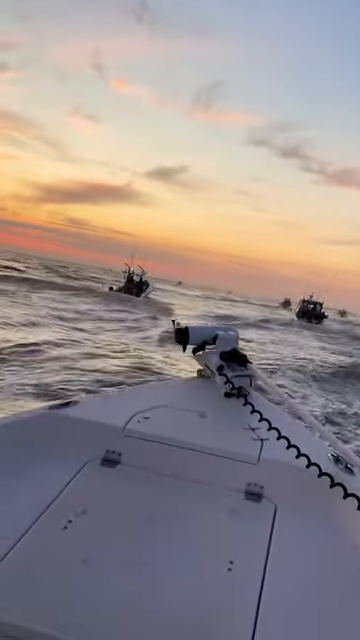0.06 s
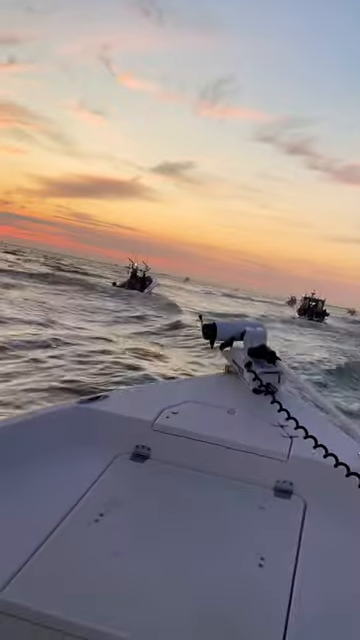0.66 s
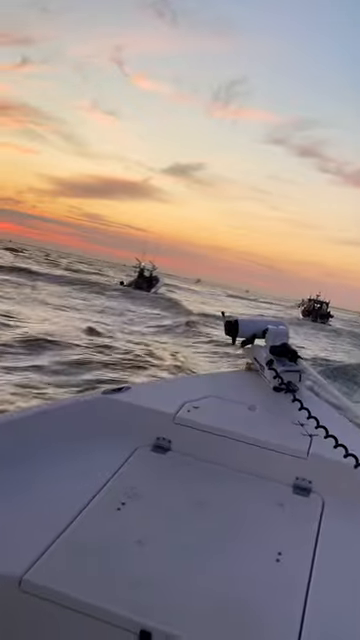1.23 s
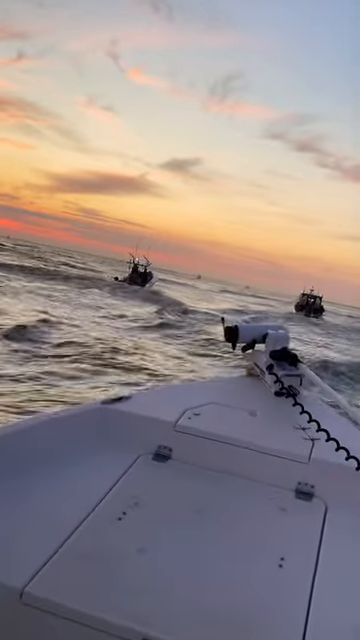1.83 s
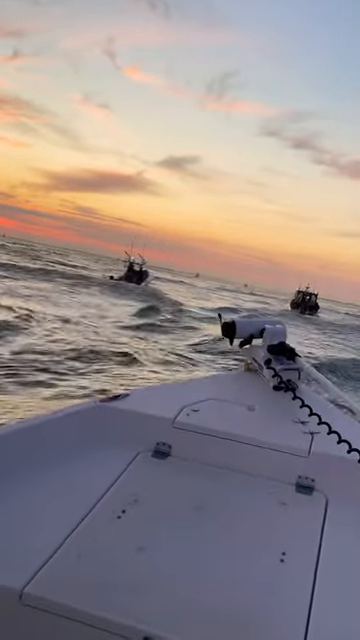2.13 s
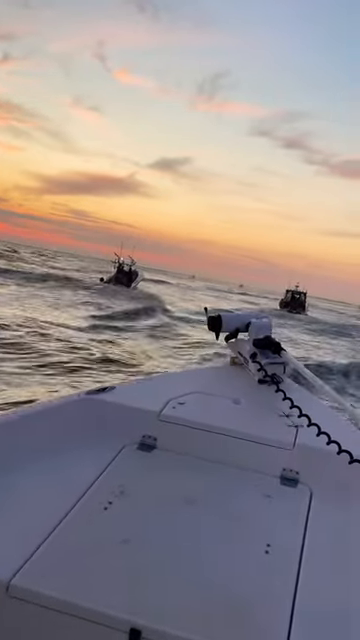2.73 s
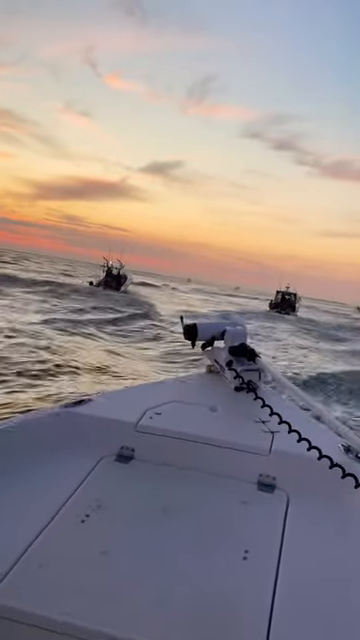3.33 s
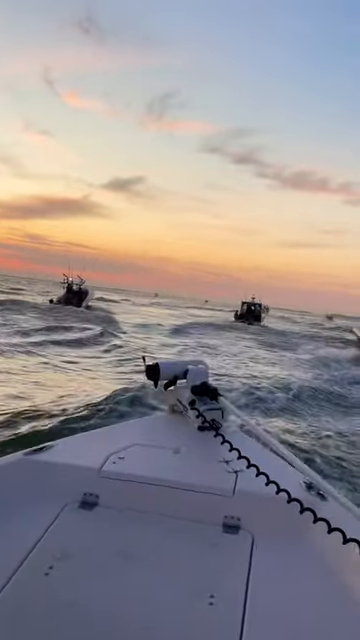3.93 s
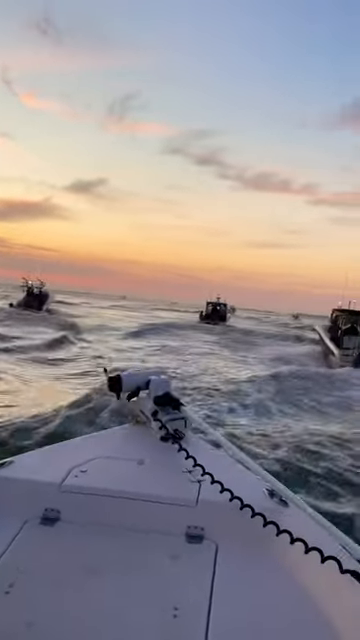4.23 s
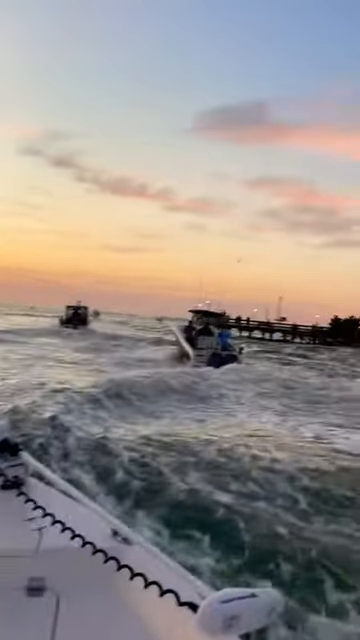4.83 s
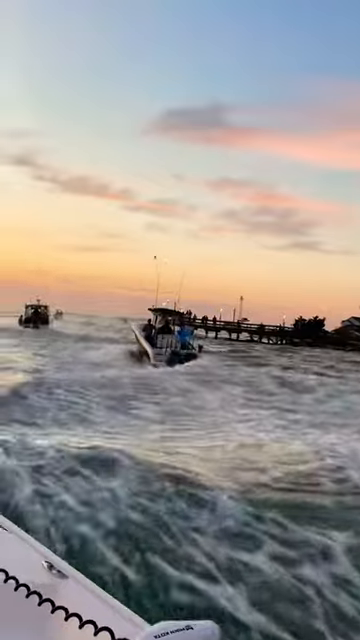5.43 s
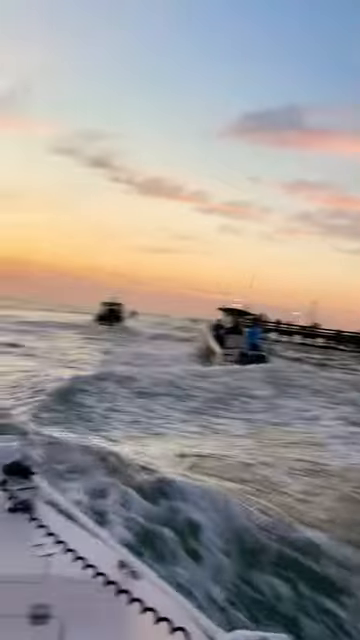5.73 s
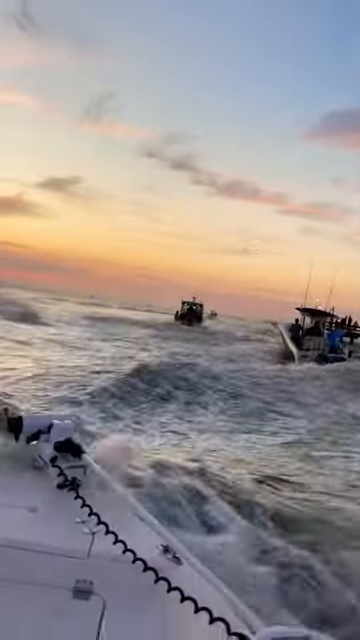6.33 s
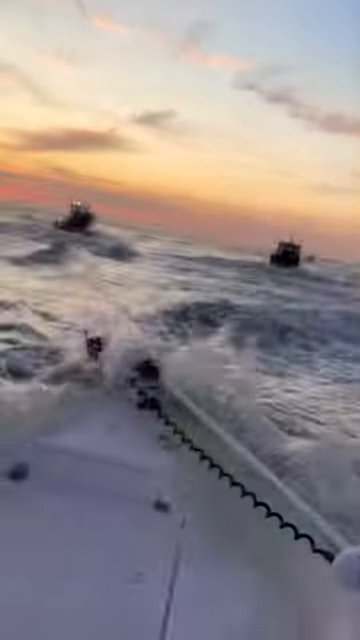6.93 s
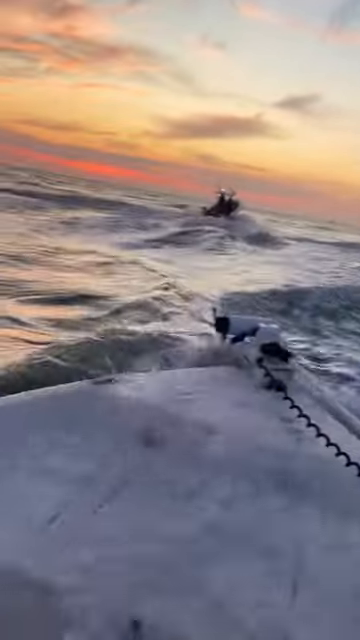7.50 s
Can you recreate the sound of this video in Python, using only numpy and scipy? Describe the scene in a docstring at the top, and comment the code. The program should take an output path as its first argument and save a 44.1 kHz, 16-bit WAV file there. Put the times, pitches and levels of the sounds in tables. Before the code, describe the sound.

An outboard motor hums through choppy water and slows, before waves slap the hull with deep thuds and hissing spray.

```python
"""A six-cylinder outboard drones over rushing water, heard from a speedboat's deck: it sags, speeds up,
holds, then is throttled back. Its exhaust booms at the firing rate and its propeller throbs.
Chop rumbles under the hull, the bow wave rushes and bubbles, and spray hisses along the side.
Then the bow drops into a wake: slaps, deep thuds from the ringing hull and a shower over the deck."""
import sys
import numpy as np
from scipy import signal
from scipy.fft import rfft, irfft, next_fast_len
from scipy.io import wavfile
from scipy.ndimage import uniform_filter1d, map_coordinates

SR = 44100
rng = np.random.default_rng(int(sys.argv[2]) if len(sys.argv) > 2 else 0)


def master_out(mix):
    """Clip the mix to full scale and print it as 16-bit PCM to the path in sys.argv[1]."""
    frames = np.transpose(np.atleast_2d(mix))
    ceiling = np.clip(frames, -1, 1)
    pcm = np.round(ceiling * 32767).astype(np.int16)
    wavfile.write(sys.argv[1], SR, pcm)


N = 337795


def amp(db):
    return 10 ** (np.asarray(db) / 20)


def unit_rms(x):
    return x / np.sqrt(np.mean(x ** 2) + 1e-20)


def along(points, hz):
    """Read (frequency, value) points at hz, on a log axis."""
    freqs, values = np.transpose(points)
    return np.interp(np.log(hz + 1), np.log(freqs + 1), values)


def curves(rows):
    """One value per sample for each column after the time."""
    times, *columns = np.transpose(rows)
    return [np.interp(np.arange(N) / SR, times, column) for column in columns]


def since(start_s):
    """Seconds since start_s, zero before it."""
    return np.maximum(np.arange(N) / SR - start_s, 0)


def held(start_s, length_s, edge_s):
    """A soft gate: fade in, hold, fade out."""
    t = np.arange(N) / SR - start_s
    return (np.tanh(t / edge_s) - np.tanh((t - length_s) / edge_s)) / 2


def swells(rows, edge_s):
    """A level ride in dB from rows of (time, length, gain)."""
    return sum(db * held(s, length, edge_s) for s, length, db in rows)


def wobble(rate):
    """A smooth random curve, rate knots a second."""
    return map_coordinates(rng.standard_normal(int(N * rate / SR) + 4), [np.arange(N) * rate / SR])


def filtered(x, response):
    """Filter x by a complex response of frequency."""
    size = next_fast_len(N + SR // 2)
    return irfft(rfft(x, size) * response(np.fft.rfftfreq(size, 1 / SR)), size)[..., :N]


def band(hz, skirt_db):
    """A spectrum peaking at hz, skirt_db lower an octave to either side."""
    return [(hz / 4, 3 * skirt_db), (hz / 2, skirt_db), (hz, 0),
            (hz * 2, skirt_db), (hz * 4, 3 * skirt_db)]


# stereo image by frequency, with two treble bands in opposite phase:
# (frequency [Hz], left phase lead [rad], likeness [0-1], left minus right [dB])
STEREO_IMAGE = [(30, 0, .7, 2.5), (70, -.03, .95, 2.3), (130, -.05, .995, 2.1), (260, -.1, .95, 2.1),
                (420, -.3, .85, 5.7), (620, -1.4, .8, 1.8), (800, -.9, .65, -1), (1250, -.05, .6, 0),
                (1800, .3, .6, 0), (2450, 2.3, .5, -1.3), (3200, 3.05, .58, -.7), (4100, 2.4, .5, -.7),
                (4700, 2.9, .7, 0), (5150, 3.12, .98, 0), (6050, 3.16, .98, 0), (6500, 3.7, .7, 0),
                (7100, 4.7, .6, 0), (7700, 6.25, .98, 0), (9500, 6.3, .98, 0), (10200, 7.9, .55, 0),
                (11000, 9.4, .995, 0), (12900, 9.44, .995, 0), (13400, 11.6, .4, 0), (13900, 12.55, .98, 0)]
def stereo(direct, diffuse=None):
    """Spread a sound between left and right; its diffuse part differs between the sides."""
    freqs, phase, likeness, lean_db = np.transpose(STEREO_IMAGE)
    side = np.array([[1], [-1]])
    lean = lambda hz: amp(side * np.interp(hz, freqs, lean_db) / 2)
    path = lambda hz: lean(hz) * np.exp(.5j * side * np.interp(hz, freqs, phase))
    if diffuse is None:
        return filtered(direct, path)
    width = lambda hz: np.arccos(np.clip(np.interp(hz, freqs, likeness), 0, 1)) / 2
    shared = filtered(direct, lambda hz: path(hz) * np.cos(width(hz)))
    return shared + side * filtered(diffuse, lambda hz: path(hz) * np.sin(width(hz)))


def rush(spectrum, patchy_db, grain_db, patch_size=10):
    """Stereo water noise, rms 1: random patches in pitch and time, broken into millisecond bursts."""
    cells = signal.stft(rng.standard_normal((2, N)), nperseg=512)[2]
    patches = rng.standard_normal(cells.shape[1:])
    for axis in (0, 1):
        patches = uniform_filter1d(patches, size=patch_size, axis=axis)
    patchy = signal.istft(cells * amp(patchy_db * unit_rms(patches)), nperseg=512)[1][:, :N]
    grainy = patchy * amp(grain_db * wobble(700))
    return unit_rms(stereo(*filtered(grainy, lambda hz: amp(along(spectrum, hz)))))


def grains(count, centre_hz, octaves, cycles, spread_db, rise, samples=400):
    """Short pings of random pitch and size, rms 1; rise bends each upward as it dies."""
    when, pitch, chance = rng.uniform(size=(3, count, 1))
    tick = np.arange(samples)
    turns = centre_hz * 2 ** (octaves * (pitch - .5)) * tick / SR
    age = turns / cycles
    envelope = amp(-spread_db * np.log(chance + 0.075)) * np.exp(-age) * (1 - tick / samples)
    pings = envelope * np.sin(2 * np.pi * turns * (1 + rise * age))
    positions = (when * N).astype(int) + tick
    return unit_rms(np.bincount(positions.ravel(), pings.ravel(), N)[:N])


def cloud(**settings):
    """Two independent streams of grains, spread in stereo."""
    return stereo(grains(**settings), grains(**settings))


# rough water, swelling across another boat's wake: (time [s], bow wave [dB], hull rumble [dB])
SEA_STATE = [(0, -28.5, -23.5), (.55, -27.5, -24), (1.2, -26.5, -24), (2, -27.5, -26), (3.3, -25.5, -25),
             (4.45, -23.5, -25), (5.2, -21, -21.5), (6.15, -28, -23.5), (6.7, -24.5, -23.5),
             (7.66, -24.5, -20.5)]
# the dark bed under the hull: (frequency [Hz], relative density [dB])
RUMBLE_SPECTRUM = [(20, -27), (35, -16), (50, -9), (68, 1.5), (92, -2.5), (115, -1), (160, -3), (240, -7.5),
                   (330, -10.5), (500, -28), (1000, -70)]
def hull_rumble():
    """Chop rumbles under the hull."""
    _, rumble_db = curves(SEA_STATE)
    return amp(rumble_db) * rush(RUMBLE_SPECTRUM, patchy_db=1, grain_db=-0.5)


# hull panel resonances: (pitch [Hz], width [Hz], relative level [dB])
PANEL_MODES = [(113.8, 11.8, 2.5), (136.95, 4.5, 3), (188.6, 6.2, -9), (236.3, 29, -13.5)]
# broken water shakes the panels: (time [s], length [s], boost [dB])
PANEL_SHAKES = [(5.75, 0.84, 8.5), (6.92, 1, 5.5)]
def panel_drumming(trim_db=-8):
    """Shaken at random by the water, the panels drum at their own pitches."""
    ringing = lambda f: sum(amp(db) / (1 + 2j * (f - hz) / width) ** 2 for hz, width, db in PANEL_MODES)
    drumming = unit_rms(stereo(filtered(rng.standard_normal(N), ringing)))
    _, rumble_db = curves(SEA_STATE)
    return amp(rumble_db + trim_db + swells(PANEL_SHAKES, edge_s=0.086)) * drumming


# spells of panel hum: (time [s], length [s], level [dB])
HUM_SPELLS = [(4.665, 0.2, -26.5), (5.081, 0.28, -26), (5.397, 0.39, -29.5), (5.822, .2, -27.5),
              (6.05, .28, -31)]
def panel_hum(waver_db=1.1, wander_rad=0.45):
    """The highest panel hums on and off across the wake."""
    envelope = sum(amp(db) * held(s, length, edge_s=0.046) for s, length, db in HUM_SPELLS)
    tone = np.sqrt(2) * np.sin(2 * np.pi * PANEL_MODES[-1][0] * since(0) + wander_rad * wobble(12))
    return stereo(amp(waver_db * wobble(14)) * envelope * tone)


# the body of the bow wave: (frequency [Hz], relative density [dB])
WAVE_SPECTRUM = [(120, -28), (250, -4), (370, 1), (560, -1.5), (760, -4.5), (1050, -20), (1600, -28),
                 (4000, -56)]
def bow_wave(trim_db=-1.4):
    """The bow wave rushes, louder in rough water."""
    wave_db, _ = curves(SEA_STATE)
    level_db = wave_db + trim_db + 0.15 * wobble(14)
    return amp(level_db) * rush(WAVE_SPECTRUM, patchy_db=0.87, grain_db=0.56)


SHOWER_S, SHOWER_RISE_S = 6.11, 0.16  # the bow digs into the wake and spray comes over the deck
def breaking_db(rest_db, wave_share, step_db, db_per_s, calm_db=-28.5):
    """Level of breaking water: it follows the bow wave, then steps up and drifts in the shower."""
    wave_db, _ = curves(SEA_STATE)
    age = since(SHOWER_S)
    shower_db = step_db * np.minimum(age / SHOWER_RISE_S, 1) + db_per_s * age
    return rest_db + wave_share * (wave_db - calm_db) + shower_db


# the bow cuts a crest: (time [s], length [s], spray boost [dB], splash boost [dB])
CREST_HITS = [(.02, 0.14, 8.5, 1.5), (0.4, 0.52, 7, 3), (1.292, 0.32, 7, 3), (1.97, 0.35, 2, 0.6),
              (2.517, .33, 3.5, -0.1), (3.33, 0.16, 8, 0), (3.594, 0.28, 4, 1.5), (4.09, 0.53, 4.5, 1),
              (4.92, 0.44, 3.5, -1), (5.76, 0.37, 6, 2.2), (6.306, 0.2, 4, 0.5), (7.01, 0.073, 1.5, 3),
              (7.42, 0.33, 4, -1.5)]
def crest_boosts(edge_s=0.051):
    """Each crest throws up water: level rides in dB for the spray and the splash."""
    return sum(np.outer(boosts, held(s, length, edge_s)) for s, length, *boosts in CREST_HITS)


def splash_db():
    """The level ride shared by the splash and its bubbles."""
    return breaking_db(rest_db=-37, wave_share=0.26, step_db=4.5, db_per_s=1) + crest_boosts()[1]


# the wet midrange: (frequency [Hz], relative density [dB])
SPLASH_SPECTRUM = [(400, -9), (900, 1.5), (1300, 0.5), (1800, 1.2), (2300, -2), (3100, -18), (5000, -47)]
def splash(bubble_db=-4):
    """The bow wave's crest breaks into splashing noise and small ringing bubbles."""
    flicker = amp(0.45 * wobble(35))
    wash = rush(SPLASH_SPECTRUM, patchy_db=2.3, grain_db=0.4, patch_size=4)
    bubbles = cloud(count=4500, centre_hz=1415, octaves=1.76, cycles=4.7, spread_db=1, rise=0.031)
    return amp(splash_db()) * (flicker * wash + amp(bubble_db) * bubbles)


# the fizz above the splash: (frequency [Hz], relative density [dB])
FROTH_SPECTRUM = [(1500, -22), (2300, 1), (3100, -1.2), (4200, .6), (5400, -3.5), (6500, -9), (9000, -25)]
def froth(crest_share=0.2):
    """Froth fizzes on the breaking bow wave and follows its swing closely."""
    level_db = breaking_db(rest_db=-42, wave_share=1.3, step_db=4.5, db_per_s=-0.5)
    level_db += crest_share * crest_boosts()[0] + 1.06 * wobble(60)
    return amp(level_db) * rush(FROTH_SPECTRUM, patchy_db=3.1, grain_db=-0.5, patch_size=4)


# the airy top end: (frequency [Hz], relative density [dB])
SPRAY_SPECTRUM = [(2000, -25), (3500, -9), (5400, -3.5), (7000, -.3), (8800, .3), (10300, -.8), (12000, -3),
                  (13400, -6.5), (15600, -7)]
def spray(crest_share=0.74):
    """Fine spray hisses up at each crest and builds through the shower."""
    level_db = breaking_db(rest_db=-38.5, wave_share=0.27, step_db=6.7, db_per_s=3.5)
    level_db += crest_share * crest_boosts()[0] + 0.5 * wobble(45)
    return amp(level_db) * rush(SPRAY_SPECTRUM, patchy_db=2.25, grain_db=0.16, patch_size=5)


def gurgle(pop_trim_db=-10, clump_db=1, churn_db=-35):
    """Single bubbles ring in clumps over the splash; larger, lower ones churn in the wake."""
    small = dict(count=3000, centre_hz=1600, octaves=1.7, cycles=11, spread_db=3, rise=.025)
    pops = stereo(*[amp(clump_db * wobble(25)) * grains(**small, samples=1100) for _ in range(2)])
    glugs = cloud(count=1800, centre_hz=580, octaves=1.4, cycles=9, spread_db=3, rise=.025, samples=2400)
    churn = amp(churn_db) * held(start_s=4.9, length_s=0.67, edge_s=0.084)
    return amp(splash_db() + pop_trim_db) * pops + churn * glugs


# passing washes: (time [s], length [s], level [dB], centre [Hz])
WATER_SHEETS = [(3.754, 0.97, -31.5, 516), (4.081, 0.27, -36.5, 1800), (4.69, 1, -38, 880),
                (4.8, 0.68, -37.5, 2538), (6.66, 0.65, -42, 1206), (7.402, 0.38, -24.5, 3000)]
def sheets(skirt_db=-28):
    """Sheets of water wash along the hull or over the deck, each a rush about one pitch."""
    return sum(amp(db) * held(s, length, edge_s=0.14)
               * rush(band(hz, skirt_db), patchy_db=4, grain_db=1.5)
               for s, length, db, hz in WATER_SHEETS)


def drops(build_s=0.99, tick_db=-36, splatter_db=-34):
    """Thrown spray lands on the deck as tiny ticks and fatter drops, growing steadily louder."""
    ticks = cloud(count=6000, centre_hz=4480, octaves=2.34, cycles=2.9, spread_db=7, rise=0)
    splatter = cloud(count=3500, centre_hz=1950, octaves=2.03, cycles=5.5, spread_db=4.5, rise=.02)
    build = since(SHOWER_S + SHOWER_RISE_S) / build_s
    return build * (amp(tick_db) * ticks + amp(splatter_db) * splatter)


# lumps of water hit the bow and deck: (time [s], level [dB], 60 dB decay [s], centre [Hz])
WATER_LUMPS = [(4.796, -23, 0.07, 825), (4.901, -19, 0.064, 663), (4.925, -28, 0.19, 2548),
               (6.446, -20, 0.08, 1550), (6.511, -23, 0.088, 1650), (6.606, -25, .07, 1400),
               (6.692, -22, .06, 1700), (6.72, -24, 0.04, 1850), (6.847, -23, 0.055, 1590),
               (6.967, -26, 0.041, 1510), (7.026, -20, .07, 7960), (7.035, -23, .08, 1600),
               (7.196, -20, 0.069, 1250), (7.235, -16.5, .035, 9500), (7.238, -24, .07, 2010),
               (7.249, -24, .025, 9500), (7.312, -23, 0.07, 1050), (7.33, -24, 0.07, 1700)]
def splats(rise_s=0.0011, skirt_db=-17):
    """Each lump of water bursts with a sharp, wet splat about its own pitch."""
    track = np.zeros(N + SR)
    t = np.arange(SR // 4) / SR
    freqs = np.fft.rfftfreq(len(t), 1 / SR)
    for s, db, t60, hz in WATER_LUMPS:
        colour = amp(along(band(hz, skirt_db), freqs))
        burst = unit_rms(irfft(rfft(rng.standard_normal(len(t))) * colour, len(t)))
        envelope = amp(db - 60 * t / t60) * (1 - np.exp(-t / rise_s))
        track[round(s * SR):][:len(t)] += envelope * burst
    return stereo(track[:N])


# water smacks the bow: (time [s], relative level [dB], 60 dB decay [s])
SLAP_HITS = [(4.796, -17, 0.066), (4.901, -20, 0.07), (6.45, -13, 0.25), (6.58, -14, 0.35)]
# the colour of a smack: (frequency [Hz], relative density [dB])
SLAP_SPECTRUM = [(120, -15), (320, -2), (520, -4), (720, -6), (950, -24), (1700, -17.5), (2600, -22),
                 (6000, -32), (14000, -44)]
def bow_slaps(rise_s=0.0025, trim_db=-1):
    """Water smacks the bow in fast, grainy bursts of noise."""
    envelope = sum(amp(db - 60 * since(s) / t60) * (1 - np.exp(-since(s) / rise_s))
                   for s, db, t60 in SLAP_HITS)
    return amp(trim_db) * envelope * rush(SLAP_SPECTRUM, patchy_db=1.5, grain_db=-2)


def ring(modes, start_s, ratio, rise_s):
    """Decaying modes struck at start_s, their pitch scaled by ratio."""
    t = since(start_s)
    tones = sum(amp(db - 60 * t / t60) * np.sin(2 * np.pi * hz * ratio * t) for hz, db, t60 in modes)
    return (1 - np.exp(-t / rise_s)) * tones


# the hollow bow's ring: (pitch [Hz], relative level [dB], 60 dB decay [s])
BOW_RING = [(320.4, 3, 0.26), (369, 0, 0.2), (495, -7, 0.14), (671, 1.5, 0.15), (765, -11, .13)]
# knocks on the bow: (time [s], level [dB], pitch [ratio])
KNOCK_HITS = [(6.448, -24, 0.97), (6.583, -20, 1), (6.606, -29, 1.03)]
def bow_knocks(rise_s=0.0025):
    """The hardest smacks knock the hollow bow into ringing."""
    return stereo(sum(amp(db) * ring(BOW_RING, s, ratio, rise_s) for s, db, ratio in KNOCK_HITS))


# the hull's lowest modes: (pitch [Hz], relative level [dB], 60 dB decay [s])
HULL_RING = [(60.8, -1, 0.23), (81.7, 2.5, 0.26), (113, -0.5, 0.14)]
# the hull lands: (time [s], level [dB], pitch [ratio])
LANDINGS = [(5.405, -19, 0.76), (5.47, -22, 0.81), (5.75, -11, 1.35), (5.944, -12, 1.4),
            (6.135, -12.5, 1.45), (6.473, -3, 1.03), (6.525, -6.5, 1.3), (6.916, -13, 1.37)]
def hull_thuds(rise_s=0.012):
    """Each landing rings the hull with a deep, soft-edged thud."""
    return stereo(-sum(amp(db) * ring(HULL_RING, s, ratio, rise_s) for s, db, ratio in LANDINGS))


# the propeller throbs harder: (time [s], length [s], boost [dB])
PROPELLER_BITES = [(1.08, 0.35, 11), (2.75, 0.74, 8.5), (3.7, 0.6, 7)]
def propeller(firing_phase, speed, thrust_db=-37, gear_ratio=1.75, waver_db=1.5):
    """Three geared-down blades throb in uneven water; their thrust falls as the engine slows."""
    blade_phase = firing_phase / gear_ratio + .25 * wobble(10)  # three blades, three firings a turn
    thrust = amp(thrust_db + swells(PROPELLER_BITES, edge_s=0.063)) * speed ** 2
    return thrust * sum(amp(db + waver_db * wobble(4.27)) * np.sin(harmonic * blade_phase)
                        for harmonic, db in [(1, -1), (2, -4)])


# engine orders, every sixth a firing harmonic: (order [multiple of cycle rate], relative level [dB])
ENGINE_ORDERS = [(3, -18), (4, 1.5), (5, -2.5), (7, -7), (8, -6), (9, -9.5), (10, -16), (11, -9.5),
                 (12, -3), (13, -4.5), (14, -6.5), (16, -6), (18, -3.5), (24, -15.5), (27, -7)]
# one order stands out of the water noise: (time [s], length [s], boost [dB], order [multiple])
ORDER_BOOSTS = [(0.947, 0.13, 13, 18), (1.15, 0.27, 3.5, 12), (1.632, 0.24, 7, 18), (2.25, .3, 5.5, 18),
                (2.7, 0.21, 6.5, 18), (2.98, 0.33, 9, 18), (3.41, 0.22, 13, 18), (3.674, 0.27, 12.5, 18),
                (1.303, .18, 11, 27), (2.05, 0.46, 2, 27), (4.003, 0.26, 4, 27)]
def cylinders(firing_phase, firing_hz, speed, full_speed_db=-35, db_per_octave=17, waver_db=1.5):
    """Unequal cylinders add weaker orders that grow with speed and lift at the highest panel's pitch."""
    cycle_phase, cycle_hz = firing_phase / 6, firing_hz / 6  # six firings in each four-stroke cycle
    panel_hz, width_hz, _ = PANEL_MODES[-1]
    growl = 0
    for order, db in ENGINE_ORDERS:
        boosts = [row[:3] for row in ORDER_BOOSTS if row[3] == order]
        resonance_db = 5 / (1 + ((order * cycle_hz - panel_hz) / width_hz) ** 2)
        level_db = db + resonance_db + swells(boosts, edge_s=0.082) + waver_db * wobble(5.84)
        phase = order * cycle_phase + 0.31 * wobble(14) + rng.uniform(0, 2 * np.pi)
        growl += amp(level_db) * np.sin(phase)
    return amp(full_speed_db + db_per_octave * np.log2(speed)) * growl


# the exhaust booms near its resonance: (firing rate [Hz], level [dB])
EXHAUST_RESPONSE = [(76, -49), (90, -24), (100, -24.5), (113, -18), (122, -20), (129, -16.5)]
# the boom fades or swells: (time [s], length [s], gain [dB])
BOOM_RIDES = [(.37, 0.45, -15), (.82, 0.054, 3), (.91, 0.12, 6), (1.45, 1, -1), (1.61, .04, -2),
              (2.4, 0.99, 0.5), (3.55, 0.46, -8.5), (4.4, 0.23, 5.5), (4.72, .5, -2)]
def exhaust(firing_phase, firing_hz, flutter_db=1.3, rough_db=0.5):
    """The exhaust booms at the firing rate, with a rough flutter in its level."""
    level_db = along(EXHAUST_RESPONSE, firing_hz) + swells(BOOM_RIDES, edge_s=0.042)
    level_db += flutter_db * wobble(20) + rough_db * wobble(60)
    return amp(level_db) * np.sin(firing_phase)


# the engine's pitch line: (time [s], firing rate [Hz])
ENGINE_SPEED = [(0, 116.5), (.08, 113.8), (.38, 112.3), (.64, 93.1), (.83, 106.8), (.95, 115.4),
                (1.14, 129.9), (1.35, 131), (1.7, 129.4), (2.3, 131.7), (2.7, 130.4), (3.8, 130.1),
                (4.33, 131.4), (4.62, 113), (5.05, 79.66), (6.5, 77.64), (7, 71.5), (7.66, 69)]
def outboard(pitch_jitter=0.0039):
    """One slightly unsteady crankshaft drives the exhaust, the cylinder orders and the propeller."""
    firing_hz, = curves(ENGINE_SPEED)
    speed = firing_hz / firing_hz.max()
    phase = 2 * np.pi * np.cumsum(firing_hz * (1 + pitch_jitter * wobble(12))) / SR
    drone = exhaust(phase, firing_hz) + cylinders(phase, firing_hz, speed) + propeller(phase, speed)
    return stereo(np.sqrt(2) * drone)


def scene():
    """The outboard over hull and water, then the wake's hits and shower."""
    engine = outboard()
    hull = hull_rumble() + panel_drumming() + panel_hum()
    water = bow_wave() + splash() + froth() + spray() + gurgle() + sheets()
    wake = drops() + hull_thuds() + bow_knocks() + bow_slaps() + splats()
    return engine + hull + water + wake


def record(dry, low_cut_hz=28, top_hz=15700):
    """Roll off the deepest bass and cut everything above top_hz."""
    return filtered(dry, lambda hz: (hz < top_hz) * hz ** 2 / np.hypot(hz ** 2, low_cut_hz ** 2))


dry = scene()
out = record(dry)
master_out(out)
```